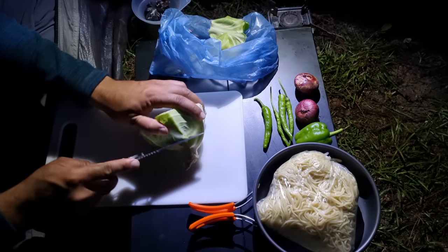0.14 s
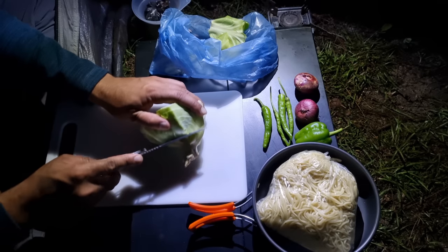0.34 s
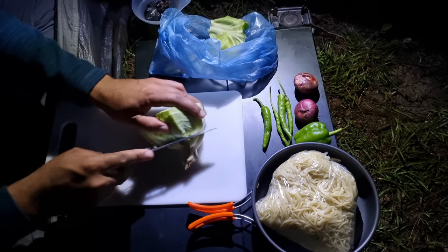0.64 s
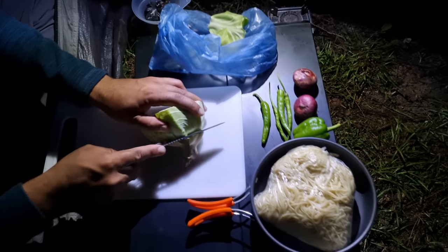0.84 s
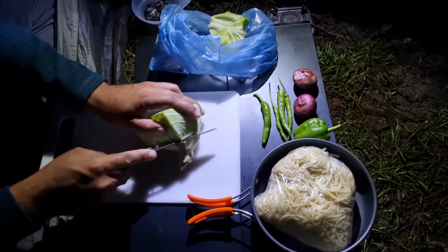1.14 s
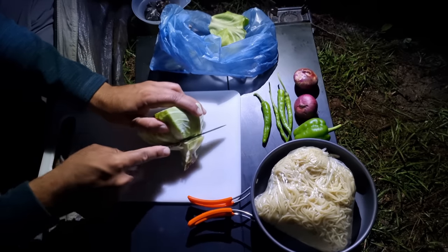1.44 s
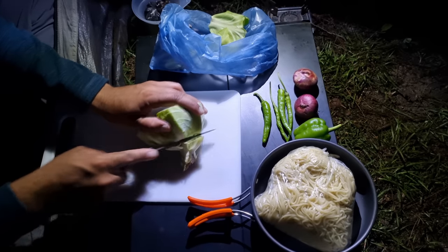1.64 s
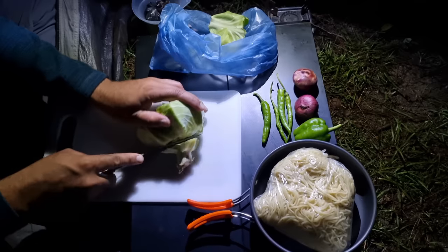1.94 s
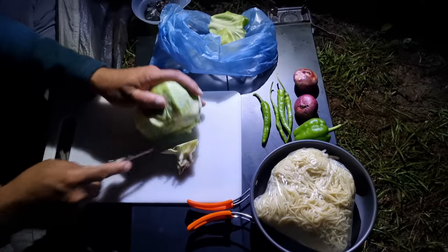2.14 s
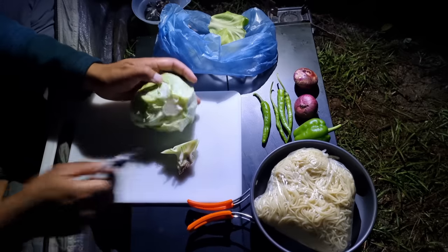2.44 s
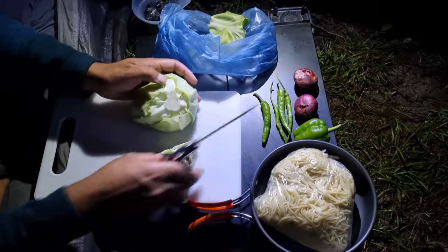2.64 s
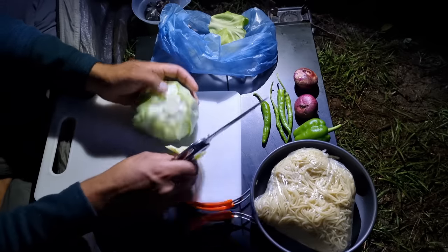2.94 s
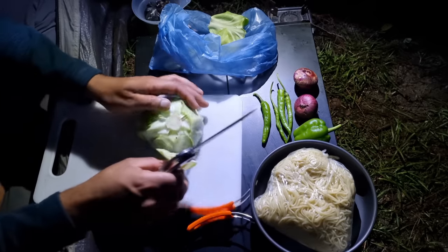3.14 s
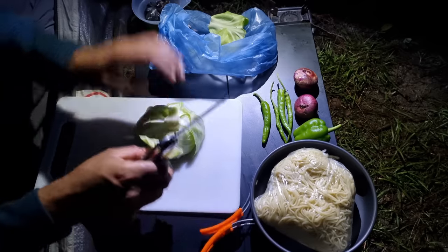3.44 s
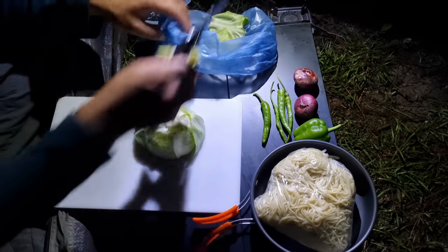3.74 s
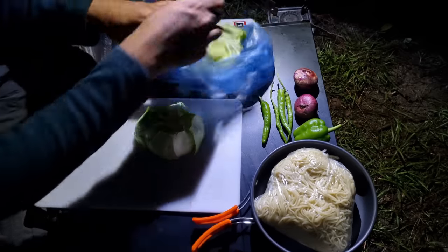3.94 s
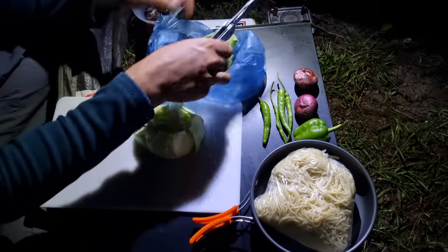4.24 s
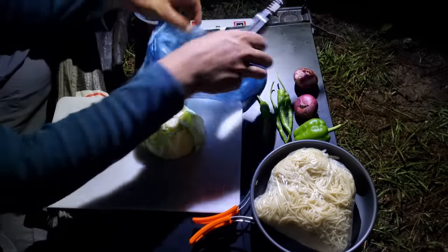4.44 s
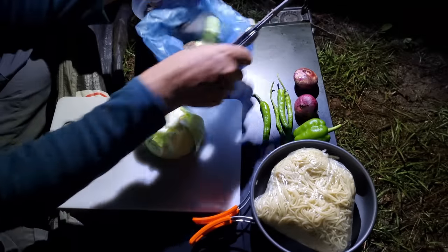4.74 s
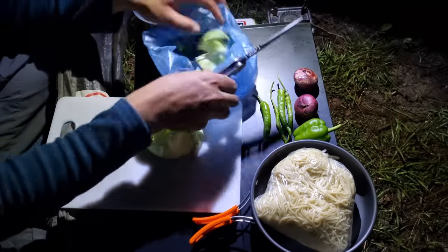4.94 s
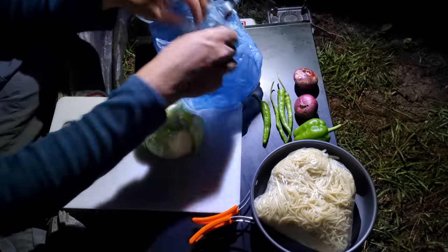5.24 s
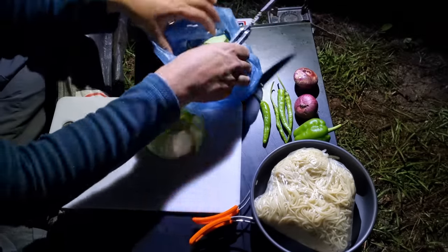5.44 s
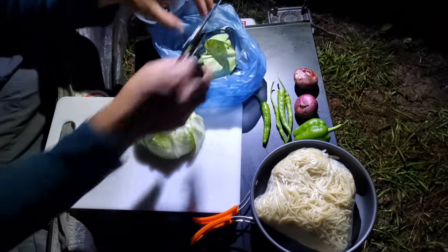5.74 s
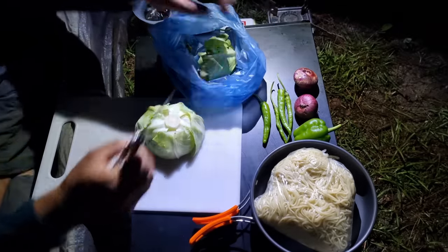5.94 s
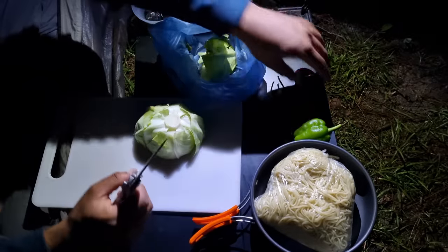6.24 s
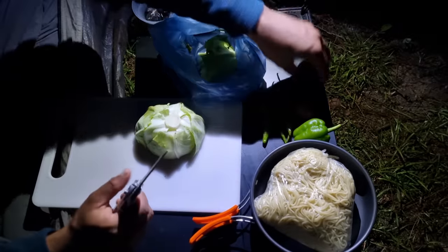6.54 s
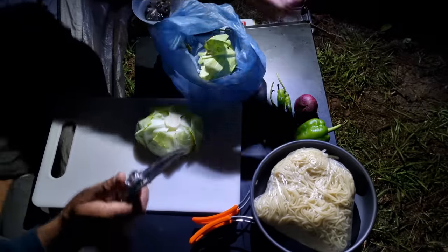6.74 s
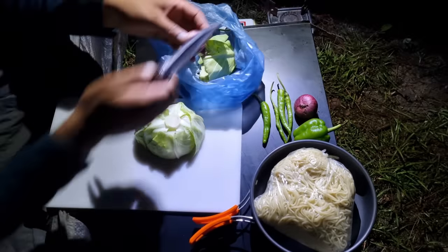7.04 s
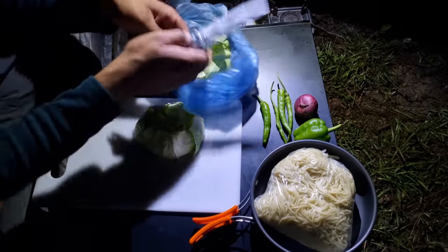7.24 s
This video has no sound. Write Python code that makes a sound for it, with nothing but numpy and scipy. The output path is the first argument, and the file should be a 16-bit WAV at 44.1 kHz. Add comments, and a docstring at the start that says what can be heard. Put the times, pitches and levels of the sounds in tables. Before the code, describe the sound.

Close-miked stereo, outdoors at night, dry with only faint hiss and soft low air. From 0 s a knife saws a cabbage on a plastic board: light crunchy rasps, with a sharp cluster of fibre snaps and a knock near 0.4 s and a crisp snap at 0.93. Strokes thicken from 1.3 s, cracking hard at 1.42 and peaking in a very loud, bright, woody break with a hollow board knock at about 1.7. Faint tearing ticks follow to 2.5, then near quiet. At 3.0-3.3 there are light scrapes and a strong crisp double crack with knocks. From 3.7 to 5.4 a thin plastic bag rustles in swelling, crackly bursts, with a pop at 4.45, soft table thumps and the fullest crinkle around 5.3. A low sliding hum comes at 5.7; then sparse faint crinkles, tiny set-down taps at 6.4, and a small rustle and tick from 7.0 to the end.

```python
"""Cabbage cut on a camp table at night

A knife saws through a cabbage on a plastic board: noise crackles under each stroke, fibres snap as short cracks
with a ring, and the head knocks the board's modes. Then scraps go into a thin plastic bag that rustles and pops.
The table rumbles and hums under it. Two microphone ports hear it close by, over faint night hiss and soft low air."""
import sys
import numpy as np
from scipy import signal
from scipy.fft import rfft, irfft, next_fast_len
from scipy.io import wavfile

SR = 44100
rng = np.random.default_rng(int(sys.argv[2]) if len(sys.argv) > 2 else 0)


def log_audio(samples):
    """Write samples as a 16-bit WAV file to the path given in sys.argv[1]."""
    # one column per channel
    frames = np.atleast_2d(samples).T
    # limit to full scale, then quantise
    limited = np.clip(frames, -1, 1)
    pcm = np.round(limited * 32767).astype(np.int16)
    wavfile.write(sys.argv[1], SR, pcm)


N = 325017
SIZE = next_fast_len(N + 8192)   # transform length, with room for filter tails
HZ = np.maximum(np.fft.rfftfreq(SIZE, 1 / SR), 1)

# All levels are relative settings ahead of the ports; a negative sag is a rise.
# Blade strokes through the leaves and the head dragged over the board:
# start_s, swell_s, hold_s, level_db, sag_db (over the hold), rumble_db (board, relative to the crunch)
STROKE_MOVES = [(0.0, 0.0017, 0.27, -52, 14, -17), (0.01, 0.032, 0.015, -49, 0, -20),
                (0.1, 0.049, 0.026, -33.5, 6, -20), (0.234, 0.024, 0.089, -48.5, -9, -24),
                (0.397, 0.018, 0.15, -53, 13, -18), (0.515, 0.16, 0.094, -37.5, 21.5, -16),
                (0.707, 0.02, 0.17, -52, -9, -16), (0.916, 0.02, 0.16, -46.5, -2, -12.5),
                (1.104, 0.011, 0.24, -61, -4, -9), (1.288, 0.025, 0.038, -37.5, 13.5, -28),
                (1.321, 0.046, 0.091, -30.5, -0.5, -20), (1.491, 0.11, 0.025, -32, 4, -18.5),
                (1.633, 0.087, 0.025, -16, 17.5, -10.5), (1.78, .01, 0.12, -63, 10, -26),
                (1.99, 0.0444, 0.021, -45.5, 1.5, -22), (2.069, 0.014, 0.15, -57, 7.5, -28.5),
                (2.806, 0.08, 0.13, -68, 3, -6), (3.008, 0.011, 0.09, -44.5, 4, -19),
                (3.123, 0.016, 0.087, -42.5, 8.5, -6.5), (3.194, 0.011, 0.1, -22.5, 18, -13),
                (3.417, 0.03, 0.073, -67.5, 10.5, -28)]
# Colour of the cut cabbage, for strokes and snaps: freq_hz, density_db (per Hz)
CABBAGE_COLOUR = [(350, -22.5), (600, -29.5), (737, -8.5), (1040, 1), (1350, -12.5), (1750, 0.5),
                  (2090, -11.5), (2610, -4.5), (3080, -6.5), (4160, -5), (4650, -6), (8160, -5),
                  (9110, -13), (12700, -9), (16000, -14)]
STROKE_RELEASE_DB_PER_S, STROKE_AIR_DB = 600, -1.5


def blade():
    """The blade tears fibres: clumped crackle and single ringing breaks swell with each stroke."""
    *timing, level_db, sag_db, _ = np.transpose(STROKE_MOVES)
    crunch = gestures(*timing, level_db, sag_db, STROKE_RELEASE_DB_PER_S)
    rasp = crackle(620, spread_db=-3.0, grain_s=0.0028, clump_db=-1.0, smooth=1.0)
    fibres = pings(700, low_hz=744, high_hz=5760, cycles=4.8, spread_db=2.5)
    rasp = rasp + from_db(-8.0) * fibres
    bands = [crunch, crunch, crunch * from_db(STROKE_AIR_DB)]
    return coloured(split(bands, rasp), CABBAGE_COLOUR)


# Fibres and leaves snapping, before the trims:
# start_s, level_db, pitch_hz (ring), breadth_db (body and air relative to the middle), decay_s (crack, to -60 dB)
SNAP_EVENTS = [(0.0198, -28, 1640, -8, .018), (0.26, -31, 1260, -12, .03), (0.267, -28, 900, -8.5, 0.016),
               (0.3693, -9.5, 930, -3.5, 0.013), (0.378, -9, 7830, -2, 0.0087),
               (0.3869, -13, 877, -0.5, .012), (0.628, -29, 1020, -3.5, 0.0087),
               (0.641, -31.5, 946, 5.5, .03), (0.676, -36.5, 1600, 5.5, .04), (0.706, -28, 1000, -3, 0.011),
               (0.7348, -29.5, 990, 0.5, 0.0086), (0.7951, -29, 970, -9.5, 0.012),
               (0.832, -23, 3940, -12, 0.027), (0.8926, -31, 1600, -7, 0.029),
               (0.9114, -25.5, 3560, -14, .016), (0.9346, -12, 4160, -8.5, 0.013),
               (0.957, -29, 4270, -4.5, 0.015), (1.178, -42, 6360, -2.5, 0.028),
               (1.2825, -21, 2720, -4.5, 0.016), (1.2937, -21.5, 1100, -6, 0.025),
               (1.3397, -24.5, 3370, -6, 0.023), (1.3702, -20, 1036, -6.5, 0.015),
               (1.4159, -8, 930, -0.5, 0.012), (1.4302, -10, 5850, -4.5, .022),
               (1.4395, -16, 980, -8.5, .012), (1.458, -14.5, 1040, -2.5, 0.021),
               (1.521, -36.5, 2970, -9, 0.022), (1.5501, -20, 1710, -8, 0.019),
               (1.5837, -24, 2700, -19.5, 0.015), (1.6205, -27.5, 1090, -2, 0.02),
               (1.6484, -19, 4110, -6.5, 0.014), (1.6672, -16, 2400, -4, 0.024),
               (1.6761, -14.5, 1100, -5, .011), (1.6897, -1, 4150, -10.5, 0.011),
               (1.695, -6, 2320, -12.5, 0.0075), (1.7063, -3.5, 810, -12, 0.0097),
               (1.864, -49.5, 1690, -5, 0.024), (1.9186, -34.5, 1950, -21.5, 0.011),
               (1.951, -35.5, 1930, -27, 0.02), (1.968, -39, 3050, -21, 0.026),
               (2.0, -46.5, 3000, -9, 0.035), (2.028, -38, 4300, -18, 0.035),
               (2.117, -42, 6560, 3.5, 0.013), (2.123, -30, 3300, -17, 0.016),
               (2.1954, -33.5, 3430, -15, 0.014), (2.355, -59.5, 2540, 6.5, 0.092),
               (2.422, -41, 3500, -7, 0.091), (2.4848, -40, 2590, -10.5, 0.061),
               (3.0182, -35.5, 1020, 3.5, 0.012), (3.134, -31, 2020, -5, 0.017),
               (3.201, -6, 6130, -7.5, 0.046), (3.2323, -18.5, 796, -9.5, 0.011),
               (3.2473, -14, 1010, -3, 0.0096), (3.2505, -8, 6700, -2.5, 0.026),
               (3.2827, -17.5, 6400, -6, 0.036)]


def snaps():
    """Stiff fibres and leaves give way at once, each with a crack, a tearing tail and a ring."""
    return bursts(SNAP_EVENTS, CABBAGE_COLOUR, trim_db=0.5, body_db=1.5, air_db=5.5, tilt_db=0.5,
                  ring_db=-1, tail_db=-12, tail_t60=0.08)


# Board and table knocked: start_s, level_db (before chance), shudder_db (table)
KNOCK_EVENTS = [(0.384, -29, -56), (1.43, -20, -43), (1.46, -24, -48), (1.705, -4, -36),
                (2.088, -44.5, -62), (3.016, -25.5, -39), (3.233, -14.5, -39), (3.252, -18.5, -41),
                (3.288, -34, -59), (4.456, -25, -41.5), (4.681, -32.5, -59), (4.897, -30, -43.5),
                (6.428, -55, -58)]
# Modes of the plastic board: freq_hz, level_db, decay_s (to -60 dB)
BOARD_MODES = [(256, -14.5, 0.11), (342.5, -1.5, 0.042), (438, -23.5, 0.072)]


def knocks():
    """Soft blows ring every board mode with a strength of its own, as one signal shared by both ports."""
    start_s, level_db, _ = np.transpose(KNOCK_EVENTS)
    chance_db = rng.normal(0, 1.5, (len(start_s), len(BOARD_MODES)))
    ringing = np.zeros(N)
    for k, (hz, mode_db, t60) in enumerate(BOARD_MODES):
        clicks = np.full(N, 1e-18)
        clicks[np.round(start_s * SR).astype(int)] = from_db(level_db + mode_db + chance_db[:, k])
        r, w = from_db(-60 / (t60 * SR)), 2 * np.pi * hz / SR
        ringing += signal.lfilter([0, np.sin(w)], [1, -2 * r * np.cos(w), r * r], clicks)
    # a small board gives no deep bass
    band = signal.butter(3, [200, 900], "band", fs=SR, output="sos")
    return np.array([signal.sosfilt(band, ringing), np.zeros(N)])


# The bag's film pushed and crumpled, move by move:
# start_s, swell_s, hold_s, level_db (before drift), sag_db (over the hold)
RUSTLE_MOVES = [(3.68, 0.088, 0.28, -35, 16), (3.946, 0.15, 0.031, -42.5, -2),
                (4.082, 0.062, 0.14, -31, 10.5), (4.427, 0.025, 0.084, -33, 1),
                (4.489, 0.099, 0.22, -29, 1), (4.822, 0.079, .11, -28.5, 8), (5.058, 0.044, 0.15, -61.5, 1),
                (5.266, 0.082, 0.09, -21, 4.5), (5.517, 0.021, 0.042, -50.5, -10),
                (5.548, 0.064, 0.025, -38, 4), (5.648, 0.03, 0.025, -43, -2.5),
                (5.772, 0.015, 0.065, -62, -5.5), (5.859, 0.047, 0.11, -50.5, 18),
                (5.953, 0.25, 0.4, -53, 9.5), (6.524, 0.26, 0.024, -81, 8.5),
                (6.749, 0.012, 0.38, -59, -8.5), (7.029, 0.037, 0.21, -46, -8),
                (7.204, 0.13, 0.039, -33.5, -11)]
# Colour of the thin bag, for rustles and pops: freq_hz, density_db (per Hz)
BAG_COLOUR = [(320, -31.5), (550, -17), (950, -2), (1360, -8.5), (1700, -2), (2990, -2.5), (7790, -1),
              (9230, -7.5), (14500, -6.5), (16000, -8.5)]
RUSTLE_RELEASE_DB_PER_S = 221


def film():
    """Thin film buckles at many creases: dense crackle and tiny rings follow each push of the bag."""
    rustle = gestures(*np.transpose(RUSTLE_MOVES), RUSTLE_RELEASE_DB_PER_S)
    # large and small folds take turns, so the colour shifts
    folds = [rustle * from_db(2.16 * drift(8.5)) for band in range(3)]
    creases = crackle(900, spread_db=3.5, grain_s=.0007, clump_db=2.5, smooth=1.9)
    crinkles = from_db(-15.5) * pings(700, low_hz=680.0, high_hz=12630, cycles=8.3, spread_db=0.0)
    return coloured(split(folds, creases + crinkles), BAG_COLOUR)


# Creases of the bag popping and small things set down, before the trims:
# start_s, level_db, pitch_hz (ring), breadth_db (body and air relative to the middle), decay_s (crack, to -60 dB)
POP_EVENTS = [(3.8809, -18, 5520, -11.5, 0.017), (4.3735, -32.5, 2570, -6, .015),
              (4.4475, -14, 7000, -20, .012), (5.1533, -26.5, 4980, -18, 0.017),
              (5.18, -27.5, 8300, -18, 0.019), (6.4265, -39.5, 1930, -4, 0.089),
              (6.461, -41.5, 1100, -5, 0.099), (7.3514, -21, 890, -10, .015)]


def pops():
    """Creases snap over and small things land, each a crack with a tail and a ring."""
    return bursts(POP_EVENTS, BAG_COLOUR, trim_db=-15.0, body_db=15.5, air_db=10.5, tilt_db=8,
                  ring_db=-7.5, tail_db=-6.5, tail_t60=0.096)


# Colour of the shaken table: freq_hz, density_db (per Hz)
TABLE_COLOUR = [(15, -50.5), (25, -19), (97, -2.5), (221, -4), (317, 2.5), (540, -7.5), (600, -21),
                (780, -32), (1320, -120)]
SHUDDER_RISE_S, SHUDDER_DB_PER_S = 0.024, 356
RUSTLE_RUMBLE_DB = -22


def rumble():
    """Strokes, bag moves and knocks shake the board and table into low, grainy noise."""
    *timing, level_db, sag_db, rumble_db = np.transpose(STROKE_MOVES)
    knock_s, _, shudder_db = np.transpose(KNOCK_EVENTS)
    dragging = gestures(*timing, level_db + rumble_db, sag_db, SHUDDER_DB_PER_S)
    rustle = gestures(*np.transpose(RUSTLE_MOVES), RUSTLE_RELEASE_DB_PER_S)
    shudder = gestures(knock_s, SHUDDER_RISE_S, 0, shudder_db, 0, SHUDDER_DB_PER_S)
    shaking = dragging + from_db(RUSTLE_RUMBLE_DB) * rustle + shudder
    grains = crackle(140, spread_db=5.0, grain_s=0.0024, clump_db=0.5, smooth=1.5)
    return coloured(shaking * grains, TABLE_COLOUR)


# Something slid over the table top: start_s, swell_s, hold_s, level_db, sag_db (over the hold)
RUB_MOVES = [(5.646, 0.058, 0.28, -53, 19)]
RUB_HZ, RUB_WIDTH_HZ = 268, 78


def rubs():
    """Sliding sets one low resonance humming: band-passed noise as one signal shared by both ports."""
    edges_hz = [RUB_HZ - RUB_WIDTH_HZ / 2, RUB_HZ + RUB_WIDTH_HZ / 2]
    resonance = signal.butter(2, edges_hz, "band", fs=SR, output="sos")
    hum = rms_one(signal.sosfilt(resonance, rng.standard_normal(N)))
    return gestures(*np.transpose(RUB_MOVES), SHUDDER_DB_PER_S) * hum * [[1], [0]]


# Soft air on the ports, heard as deep bass: time_s, level_db (before drift)
BREEZE_LEVEL = [(0.0, -66), (1.718, -78), (7.37, -67)]
# Colour of that air: freq_hz, density_db (per Hz)
BREEZE_TONE = [(18, -26), (35, -5), (60, -2), (110, -7), (220, -12.5), (400, -50.5)]


def breeze():
    """Soft air on the ports: lumpy low noise that swells and sinks."""
    level_db = np.interp(np.arange(N) / SR, *np.transpose(BREEZE_LEVEL)) + 1.3 * drift(6)
    return from_db(level_db) * coloured(rng.standard_normal((2, N)), BREEZE_TONE)


# Colour of the night hiss: freq_hz, density_db (per Hz)
NIGHT_COLOUR = [(24, -67.5), (40, -13), (305, -0.5), (556, -13.5), (1020, -10.5), (7730, -5), (9500, -12),
                (13500, -9.5), (16000, -15)]
NIGHT_DB = -64.5   # middle of a slow drift


def night():
    """Faint night hiss: coloured noise under a slowly drifting level."""
    level_db = NIGHT_DB + 0.87 * drift(0.49)
    return from_db(level_db) * coloured(rng.standard_normal((2, N)), NIGHT_COLOUR)


# Level gap of the two ports: freq_hz, balance_db (left minus right)
PORT_LEVEL_GAP = [(60, 1), (150, 4.5), (450, 2), (700, 13.5), (1000, 2), (5000, 2), (8000, -2.5),
                  (10500, -8.5)]
# The ports agree in the bass, above it the left hears late: freq_hz, phase_rad (left lead)
PORT_PHASE_GAP = [(500, 0), (900, -.5), (2800, -.2), (4050, -11), (16500, -66)]
# How alike the ports hear: freq_hz, likeness (0 apart to 1 alike)
PORT_ALIKE = [(30, .75), (250, .99), (500, .96), (1000, .7), (2000, .4), (15000, .2)]


def ports(pair):
    """Shared and separate sound mixed per frequency, with the level and phase gap of the two ports."""
    shared, apart = rfft(pair, SIZE)
    alike = np.clip(at_hz(PORT_ALIKE), 0, 1)
    phase = np.interp(HZ, *np.transpose(PORT_PHASE_GAP))
    # each port takes half of either gap
    tilt = from_db(at_hz(PORT_LEVEL_GAP) / 2) * np.exp(.5j * phase)
    shared, apart = np.sqrt(1 + alike) * shared, np.sqrt(1 - alike) * apart
    return irfft([(shared + apart) * tilt, (shared - apart) / tilt], SIZE)[:, :N]


CRACK_RISE_SHARE = .04   # rise time as a share of the crack's t60
MIDDLE_RING_HZ = 2000    # pieces that ring lower are larger and have more body, higher ones more air
RING_FLOOR_HZ = 720      # small pieces sound little below this


def bursts(events, spectrum, trim_db, body_db, air_db, tilt_db, ring_db, tail_db, tail_t60):
    """Each break is a crack of a few ms with a weaker tearing tail; the broken piece rings at its own pitch."""
    levels, rings = np.zeros((3, N + SR)), np.zeros((2, N + SR))
    t = np.arange(SR // 8) / SR
    tail = (1 - np.exp(-t / 0.0046)) * from_db(tail_db - 60 * t / tail_t60)
    jolts = rng.standard_normal((len(events), 2, len(t)))
    for (start_s, level_db, hz, breadth_db, t60), jolt in zip(events, jolts):
        place = slice(round(start_s * SR), round(start_s * SR) + len(t))
        crack = (1 - np.exp(-t / (CRACK_RISE_SHARE * t60))) * from_db(-60 * t / t60)
        lean_db = tilt_db * np.log2(hz / MIDDLE_RING_HZ)   # tilt is in dB per octave of ring
        bands_db = np.array([[breadth_db + body_db - lean_db], [0], [breadth_db + air_db + lean_db / 2]])
        levels[:, place] += from_db(level_db + trim_db + bands_db) * (crack + tail)
        ring = resonate(jolt * crack, hz, np.exp(-np.pi * hz / 6 / SR))   # bandwidth a sixth of the pitch
        rings[:, place] += from_db(level_db + ring_db) * ring / np.abs(ring).max()
    cracks = coloured(split(levels[:, :N], rng.standard_normal((2, N))), spectrum)
    floor = signal.butter(4, RING_FLOOR_HZ, "high", fs=SR, output="sos")
    return cracks + signal.sosfilt(floor, rings[:, :N] + 1e-18)


def gestures(start, swell, hold, level_db, sag_db, release_db_per_s):
    """Summed gains of moves that swell to a peak, sag while held and die away when let go."""
    gain = np.full(N, 1e-9)
    for start_s, swell_s, hold_s, top_db, drop_db in np.broadcast(start, swell, hold, level_db, sag_db):
        at, rise, held = round(start_s * SR), max(swell_s, .002), max(hold_s, .002)
        t = np.arange(min(N - at, SR)) / SR   # one second at most
        fall_db = drop_db * np.clip((t - rise) / held, 0, 1)
        fall_db = fall_db + release_db_per_s * np.maximum(t - rise - held, 0)
        gain[at:][:len(t)] += np.minimum(t / rise, 1) ** 2 * from_db(top_db - fall_db)
    return gain


def crackle(per_s, spread_db, grain_s, clump_db, smooth):
    """Two noises (shared by the ports, and apart) under one train of tiny clumped bursts on a smooth share."""
    born = rng.random(N) < per_s * from_db(clump_db * drift(25)) / SR
    sizes = from_db(spread_db * np.minimum(rng.exponential(1, N), 4))
    grains = signal.lfilter([1], [1, -np.exp(-1 / (grain_s * SR))], born * sizes + 1e-18)
    return rms_one((rms_one(grains) + smooth) * rng.standard_normal((2, N)))


def pings(per_s, low_hz, high_hz, cycles, spread_db):
    """Sparse tiny breaks, each ringing at one of nine pitches and down 60 dB after the given cycles; rms 1."""
    sizes = from_db(spread_db * np.minimum(rng.exponential(1, N), 4))
    breaks = sizes * (rng.random(N) < per_s / SR) * rng.standard_normal((2, N))
    dealt, total = rng.integers(0, 9, N), 0
    for k, hz in enumerate(np.geomspace(low_hz, high_hz, 9)):
        ring = resonate(breaks * (dealt == k) + 1e-18, hz, from_db(-60 * hz / (cycles * SR)))
        total = total + rms_one(ring) * np.sqrt(hz)
    return rms_one(total)


def resonate(x, hz, r):
    """One damped resonance; r is its decay per sample."""
    return signal.lfilter([1, 0, -1], [1, -2 * r * np.cos(2 * np.pi * hz / SR), r * r], x)


BODY_SPLIT_HZ, AIR_SPLIT_HZ = 1900, 5500


def split(levels, pair):
    """Body, middle and air bands of a noise (they add up to the whole), each under a gain of its own."""
    body, below_air = (signal.sosfiltfilt(signal.butter(2, hz, fs=SR, output="sos"), pair)
                       for hz in (BODY_SPLIT_HZ, AIR_SPLIT_HZ))
    return levels[0] * body + levels[1] * (below_air - body) + levels[2] * (pair - below_air)


def coloured(x, spectrum):
    """Causal (minimum phase) filter with the shape of the given dB spectrum and unit noise gain."""
    cepstrum = irfft(np.log(rms_one(from_db(np.maximum(at_hz(spectrum), -90)))), SIZE)
    # folding the cepstrum onto positive time makes the phase minimal
    cepstrum[1:SIZE // 2] *= 2
    cepstrum[SIZE // 2 + 1:] = 0
    return irfft(rfft(x, SIZE) * np.exp(rfft(cepstrum)), SIZE)[..., :N]


def drift(rate):
    """Slow chance of spread 1: noise smoothed twice at the rate in Hz, on every 40th sample."""
    r = np.exp(-80 * np.pi * rate / SR)
    slow = signal.lfilter([1], [1, -2 * r, r * r], rng.standard_normal(N // 40 + 2002))[2000:]
    return np.interp(np.arange(N) / 40, np.arange(len(slow)), rms_one(slow))


def at_hz(points):
    """A table read at every frequency bin, log axis."""
    hz, value = np.transpose(points)
    return np.interp(np.log(HZ), np.log(hz), value)


def from_db(db):
    """Gain of a level."""
    return 10 ** (np.asarray(db) / 20)


def rms_one(x):
    """Scaled to rms 1."""
    return x / np.sqrt(np.mean(x ** 2) + 1e-20)


def scene():
    """Knife work, bag, table and night air at the two ports."""
    cutting = blade() + snaps() + knocks()
    bag = film() + pops()
    table = rumble() + rubs()
    return ports(cutting + bag + table + breeze() + night())


STOPBAND_HZ = 16600   # 70 dB down from here up


def record(dry):
    """Peaks bend softly towards full scale, then the top is cut."""
    rounded = 0.95 * np.tanh(dry / 1.376)
    return signal.sosfilt(signal.cheby2(14, 70, STOPBAND_HZ, fs=SR, output="sos"), rounded)


dry = scene()
out = record(dry)
log_audio(out)
```